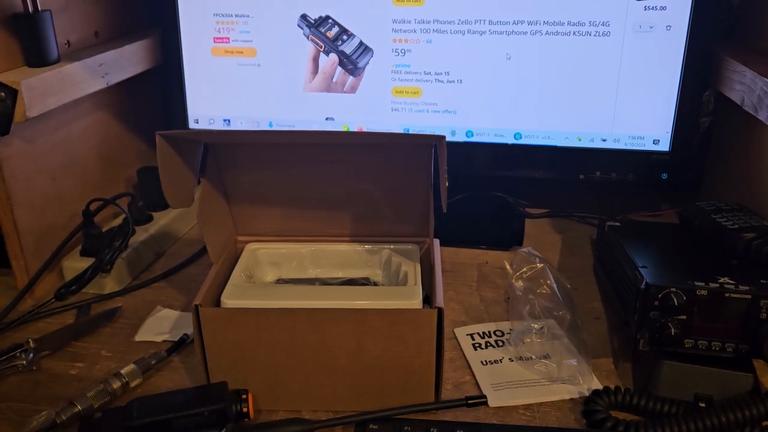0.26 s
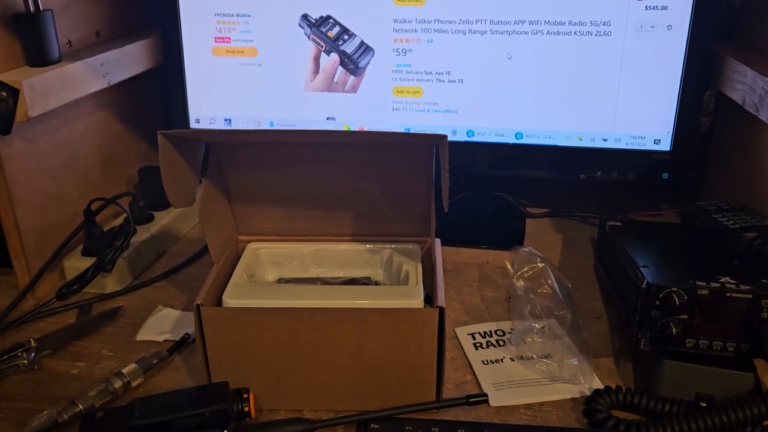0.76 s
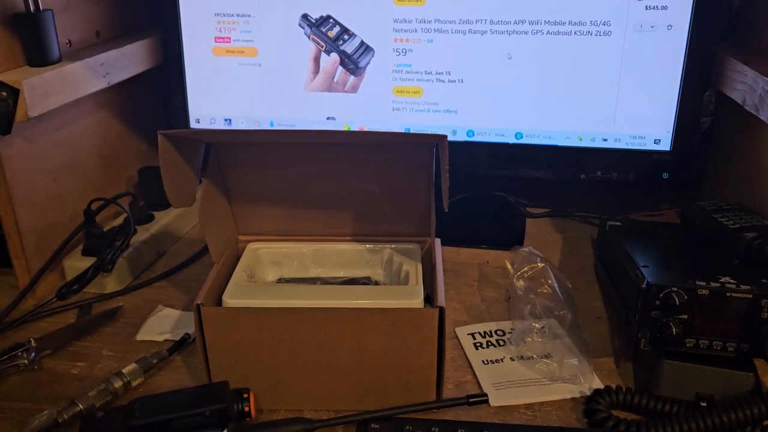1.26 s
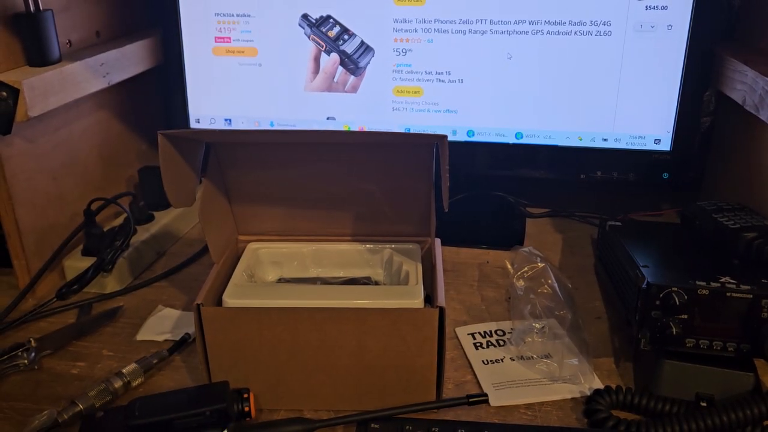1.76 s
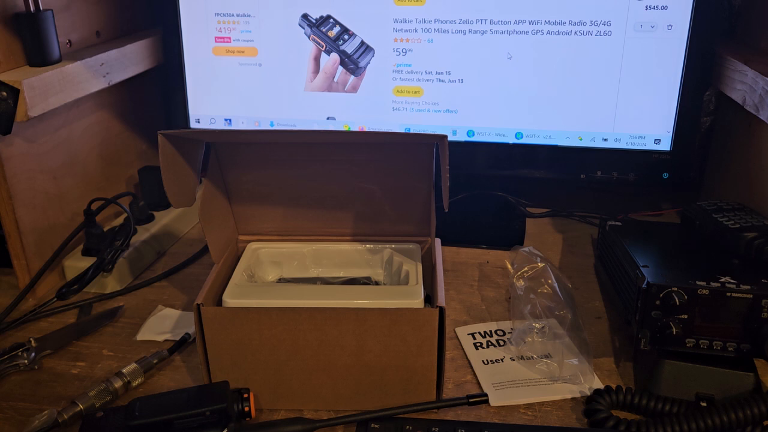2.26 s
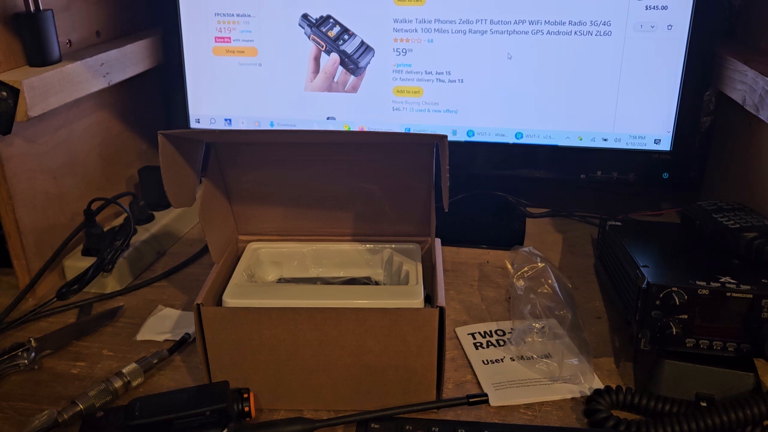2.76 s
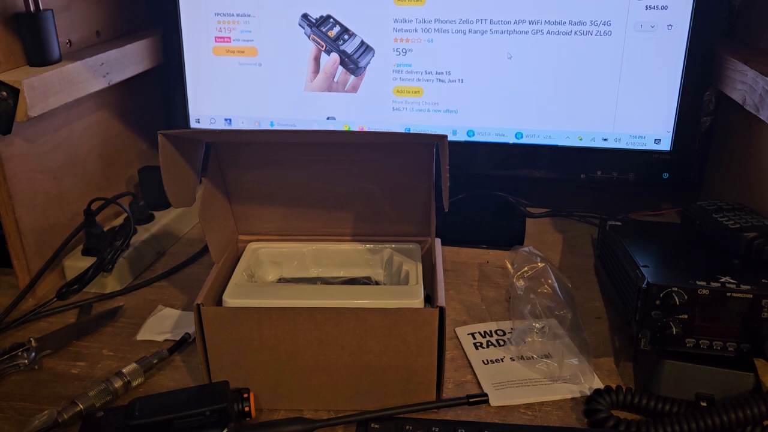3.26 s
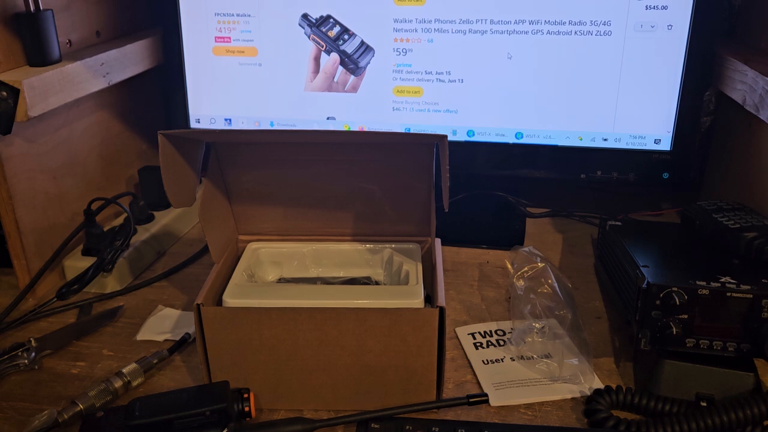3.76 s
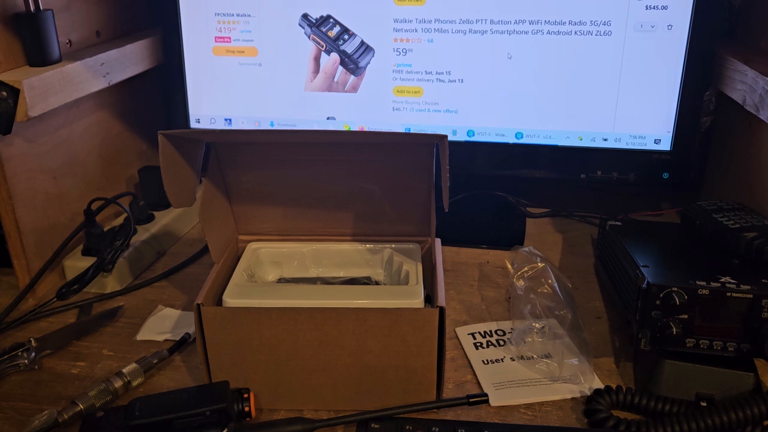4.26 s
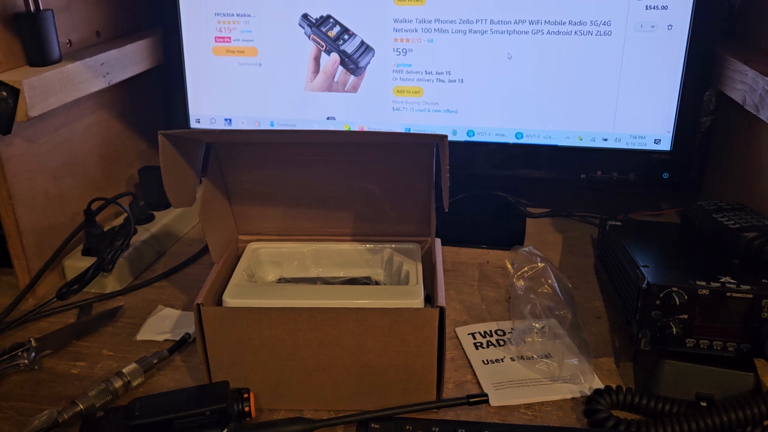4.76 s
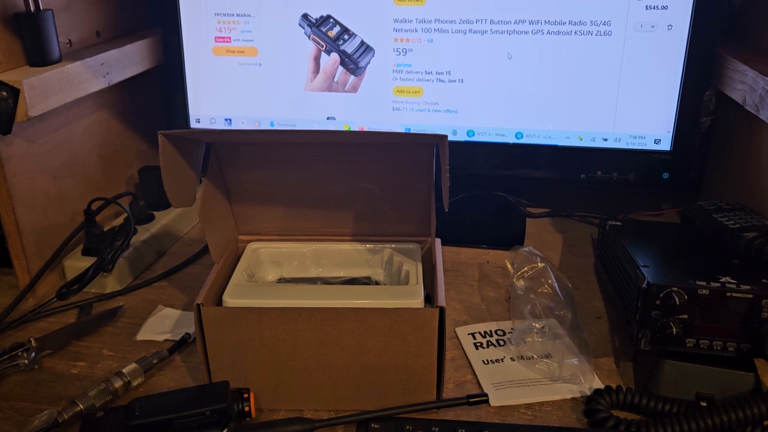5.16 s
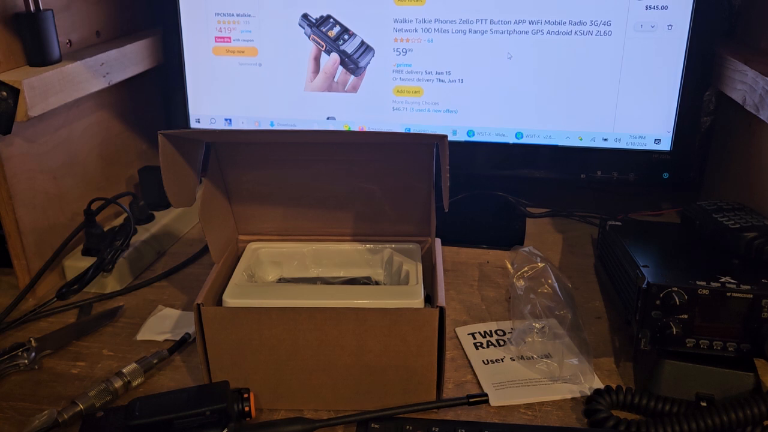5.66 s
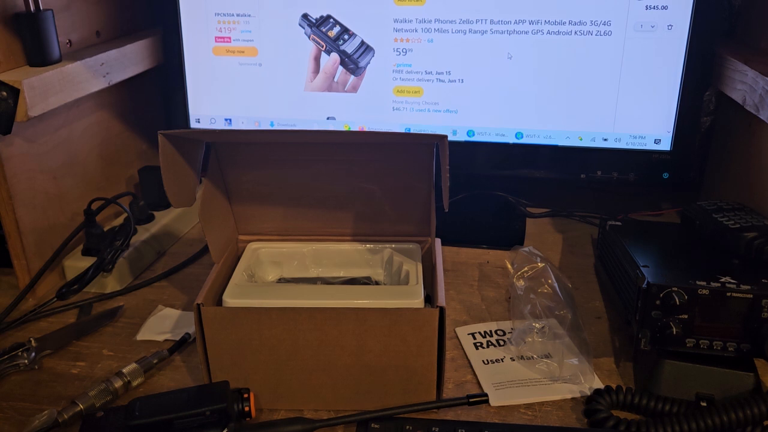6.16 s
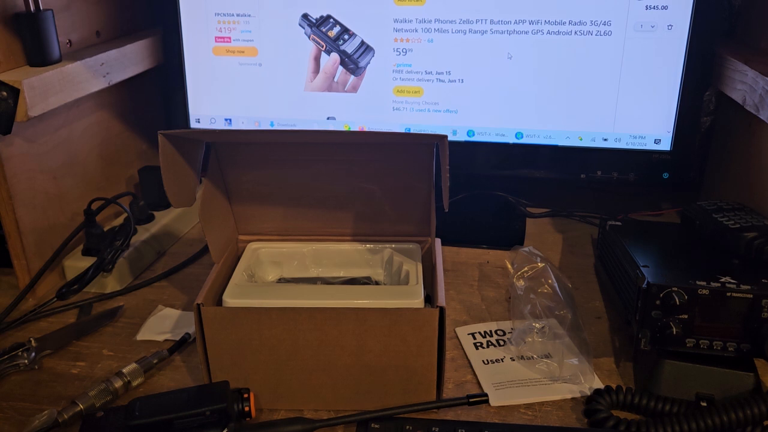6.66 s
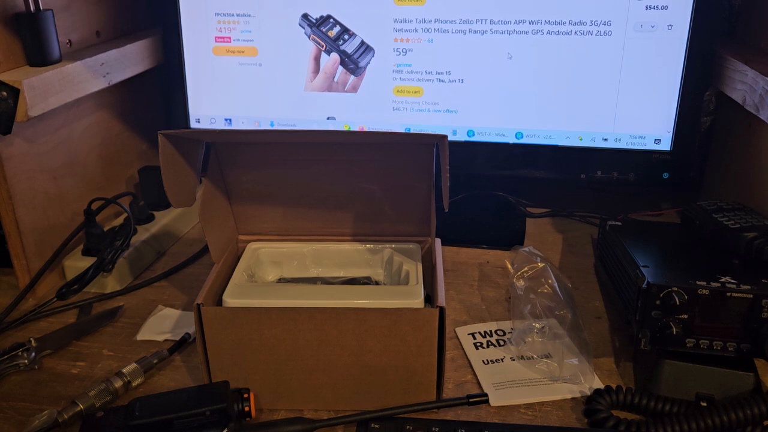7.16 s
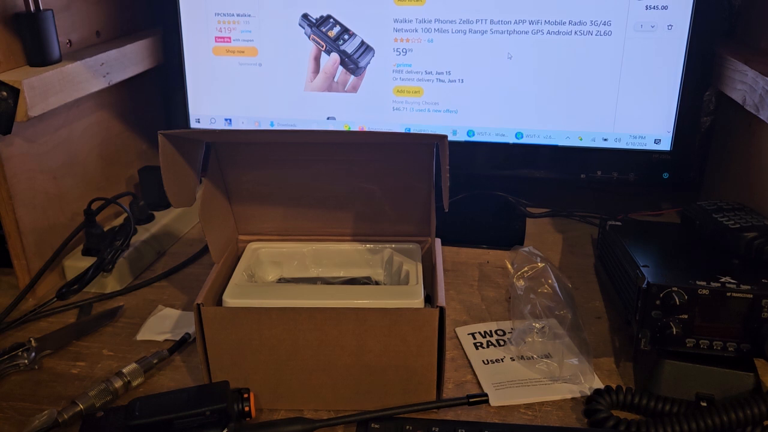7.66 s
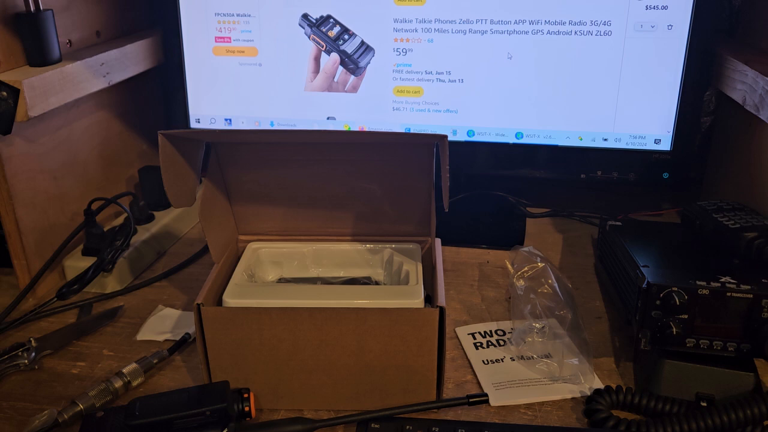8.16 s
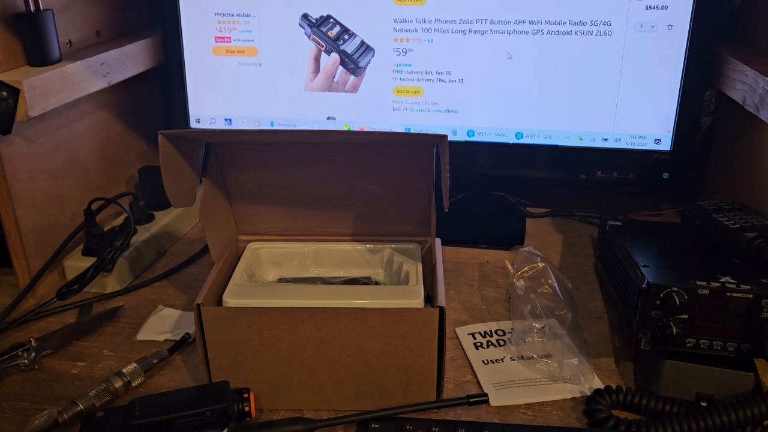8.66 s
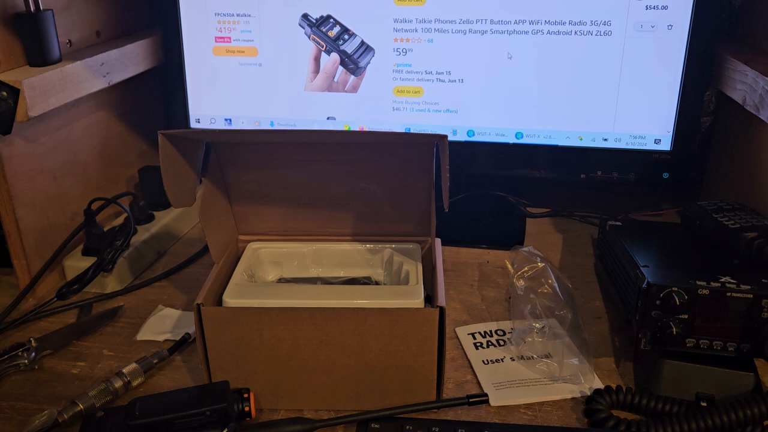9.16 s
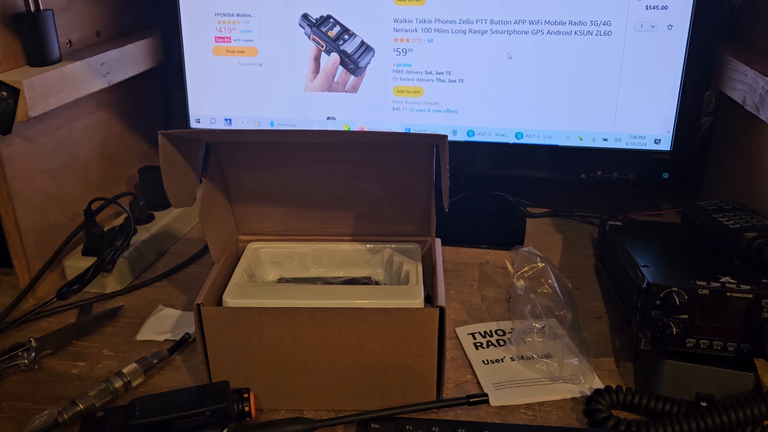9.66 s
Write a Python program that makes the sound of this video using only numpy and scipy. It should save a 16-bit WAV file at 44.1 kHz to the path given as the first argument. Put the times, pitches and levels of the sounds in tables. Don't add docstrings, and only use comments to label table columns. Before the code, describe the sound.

A low, continuous hum of a motor and fan beneath a soft, dull hiss of moving air, in a small indoor room. Early on, a tiny sharp plastic crack and a few softer clicks stand out; later ticks are extremely faint. The level stays low and constant, with only slight fluctuation, heard in stereo from a microphone resting on the desk.

```python
import sys
import numpy as np
from scipy import signal
from scipy.fft import rfft, irfft
from scipy.io import wavfile
from scipy.ndimage import map_coordinates

SR = 44100
rng = np.random.default_rng(int(sys.argv[2]) if len(sys.argv) > 2 else 0)


def boost(x):
    u = np.asarray(x, float) / 20
    return 10 ** u


def store_pcm(level_fs):
    pcm = np.round(np.clip(level_fs, -1, 1) * 32767).astype(np.int16)
    wavfile.write(sys.argv[1], SR, np.atleast_2d(pcm).T)


N = 437472
TIME = np.arange(N) / SR
HZ = np.fft.rfftfreq(N, 1 / SR)

# pitch_hz, left_db_per_hz, right_db_per_hz
AIR_SPECTRUM = [(15, -74, -79), (54, -68, -67.5), (91, -77.5, -80.5), (184, -69.5, -70.5),
                (406, -71, -71.5), (530, -84, -85.5), (888, -75.5, -77), (1936, -91.5, -94.5)]
# pitch_hz, width_hz,
# left_db, right_db
ROOM_MODES = [(108.6, 11, 6, 6), (166.7, 10, 4, 7), (185, 8.3, 11, 7), (196.2, 39.4, -8.5, -11),
              (269.4, 51.5, -6, -8), (294.3, 8.1, -12, -10), (332.3, 12.8, -6.5, -3.5), (352, 19, -4, -4),
              (385, 20, -6.5, -9.5), (422, 31, -7, -4), (540, 16, 4.5, 2.5), (587, 13, -4, -3),
              (657, 16, -10, 5), (676, 17, -5, 6),
              (40, 12, -4, -4), (78, 20, -1.5, -1.5)]
# pitch_hz, width_hz, left_db, right_db
HOUSING_MODES = [(750, 96, 1, -5), (800, 54, -8, 0), (884, 44, -7.5, -6), (981, 174, -8.5, -12),
                 (1165, 64, -7.5, -6.5), (1334, 54, -1, -2), (1720, 60, 3.5, -2), (2147, 354, 4, 7),
                 (2200, 70, 3.5, 2), (3010, 840, 3, 0.5), (3130, 90, 1.5, 1.5), (3600, 73, 5.5, 2.5),
                 (3900, 50, 5, -2.5), (7300, 440, 2.5, 3)]
# pitch_hz, width_hz, left_db, right_db
BODY_SHADOWS = [(6260, 1700, -0.5, -1.5), (9580, 1500, -7, -4), (13653, 650, 0, -6)]
# pitch_hz, left_db, right_db
PORT_RESPONSE = [(1965, 0, 0), (4350, -4.5, -2), (7340, -8.5, -7), (8710, -11, -8), (9700, -19, -22.5),
                 (12000, -21, -11.4), (15600, -28, -25.5)]
# pitch_hz, correlation (-1 to 1)
PORT_CORRELATION = [(60, 0.82), (290, 1), (640, 0.69), (1410, 0.44), (3100, 0.42), (6820, 0.35),
                    (9000, 0.09), (15000, .03)]
# pitch_hz, share (0 to 1)
NEAR_SHARE = [(500, 0), (1200, .45), (4000, .4), (9000, .25), (15000, .15)]
# multiple, level_db (rms), left_minus_right_db, left_lead_rad
MAINS_PARTIALS = [(4, -60.7, 1.2, 0.5), (6, -72.8, 2.1, 0.3)]
# start_s, peak_db, treble_tilt_db_per_octave, burst_s
TICKS = [
    (.3250, -42, 2.5, .003),
    (.3290, -45, 1, .007),
    (.3600, -55, -2, .012),
    (.4195, -52, -1, .008),
    (1.3165, -71, 13, .006),
    (4.6650, -73, 11, .03),
    (4.6950, -72, 11, .025),
]
# pitch_hz, level_db
TICK_COLOUR = [(530, -30), (900, -6), (1760, -1), (4470, -5.5), (7740, -8), (9830, -24), (12200, -15),
               (15700, -27)]
# pitch_hz, level_db, t60_s
SHELL_MODES = [(1750, -8, .08), (3176, -5, .06), (3820, -6, .2), (4560, -3.5, .05), (5300, -7, .04),
               (6730, -15, .06), (8200, -16, .06)]
# multiple, level_db (rms), left_minus_right_db, left_lead_rad
FAN_PARTIALS = [(1, -43.5, 1.2, -0.2), (2, -54.1, 0.7, -0.2), (3, -74.7, -4.3, -0.0), (4, -47.7, 0.5, -0.0),
                (6, -66.1, 2.0, 0.0), (8, -63.8, 2.2, 0.8), (15, -56.4, -0.4, 0.4), (16, -75.1, 4.0, 0.5),
                (22, -76.3, 4.3, 0.2), (30, -63.1, -3.3, 0.4)]
# multiple, level_db (rms), left_minus_right_db, left_lead_rad
MOTOR_PARTIALS = [(1, -35.7, .8, -.1), (2, -70.7, 1.4, -.1), (4, -73.2, -4.7, -.1), (15, -78.4, 2.7, .7),
                  (17, -71.4, 10.8, 1.4), (20, -76.5, 3.1, -2.), (22, -72.6, 4.3, 1.), (24, -78.3, 3.8, .6),
                  (25, -72., 3.6, 1.2), (28, -79., -1., -1.4), (29, -78., 3.9, 1.1), (31, -80., -.3, -.3),
                  (110, -85.5, -3.8, .9), (111, -86.6, -6.9, 2.1)]
# pitch_hz, level_db (per multiple)
VALVE_RATTLE = [(900, -100), (1100, -84), (2500, -92), (6500, -96), (8000, -99), (9600, -116), (11000, -97),
                (14000, -112)]
# pitch_hz, level_db
SIDE_KEPT = [(9100, 0), (9400, -8), (9650, -10), (9800, 0), (15000, 0), (15200, -7), (16000, -7)]

MOTOR_HZ, FAN_HZ, MAINS_HZ = 57.859, 27.06, 60.005
MOTOR_START_TURNS, FAN_START_TURNS = .23, .54
PORT_LAG_S, NEAR_T60_S = 7e-5, .11
TICK_TAIL_DB, TICK_TAIL_T60_S, TICK_RING_DB = -10, .15, 2
TOP_HZ = 15720


def on_log(table, column):
    table = np.array(table)
    return np.interp(np.log(HZ + 1), np.log(table[:, 0]), table[:, column])


def walk(rate_hz):
    knots = rng.standard_normal(int(N / SR * rate_hz) + 6)
    coarse = TIME[::64]
    wander = map_coordinates(knots, [coarse * rate_hz + 2], order=3)
    return 1.07 * np.interp(TIME, coarse, wander)


def diffuse_noise():
    like = np.clip(on_log(PORT_CORRELATION, 1), -.99, .999)
    mid, side = rfft(rng.standard_normal((2, N)))
    common = np.sqrt((1 + like) / 2) * mid
    opposed = np.sqrt((1 - like) / 2) * side
    both = np.array([common + opposed, common - opposed])
    both[0] *= np.exp(2j * np.pi * HZ * PORT_LAG_S)
    return both


def near_reflections():
    echoes = rng.standard_normal((2, N)) * boost(-60 * TIME / NEAR_T60_S)
    echoes /= np.sqrt(np.sum(echoes ** 2, axis=1, keepdims=True))
    return rfft(rng.standard_normal(N)) * rfft(echoes)


def air():
    db = np.array([on_log(AIR_SPECTRUM, port) + on_log(PORT_RESPONSE, port) for port in (1, 2)])
    for hz, width_hz, left_db, right_db in ROOM_MODES + HOUSING_MODES + BODY_SHADOWS:
        close = abs(HZ - hz) < 3 * width_hz
        bell = np.exp(-4 * np.log(2) * ((HZ[close] - hz) / width_hz) ** 2)
        db[:, close] += np.outer([left_db, right_db], bell)
    share = on_log(NEAR_SHARE, 1)
    noise = np.sqrt(1 - share) * diffuse_noise() + np.sqrt(share) * near_reflections()
    flow = noise * boost(db) * np.sqrt(SR / 2)
    out = np.zeros((2, N))
    swell = walk(2.955)
    octave = np.clip(np.log2(HZ / 125 + 1e-9), 0, 7)
    for band in range(8):
        part = irfft(flow * np.clip(1 - abs(octave - band), 0, 1), N)
        out += part * boost(band / 7 * (.33 * swell + .4 * walk(9.)))
    return out


def partials(table, turns, flutter, flutter_hz):
    out = np.zeros((2, N))
    stir = [walk(flutter_hz) + 1j * walk(flutter_hz) for _ in range(2)]
    for row, (multiple, level_db, pan_db, lead_rad) in enumerate(table):
        share = min(flutter * multiple, .4)
        waver = np.sqrt(1 - share ** 2) + share / np.sqrt(2) * stir[row % 2]
        offset = rng.random() * (multiple > 1)
        tone = waver * np.exp(2j * np.pi * (multiple * turns + offset))
        for port, side in enumerate((.5, -.5)):
            gain = np.sqrt(2) * boost(level_db + side * pan_db)
            out[port] += (tone * (gain * np.exp(1j * side * lead_rad))).real
    return out


def transformer():
    return partials(MAINS_PARTIALS, MAINS_HZ * TIME, flutter=.03, flutter_hz=3.)


def ticks(size=N // 24):
    out = np.zeros((2, N))
    coarse = slice(0, None, (len(HZ) - 1) // (size // 2))
    bins = size // 2 + 1
    colour_db = on_log(TICK_COLOUR, 1)[coarse][:bins]
    octaves = np.log2(HZ[coarse][:bins] / 4000 + 1e-3)
    noise = irfft(diffuse_noise(), N) / np.sqrt(np.mean(boost(colour_db) ** 2))
    age = TIME[:size]
    tail = boost(TICK_TAIL_DB - 60 * age / TICK_TAIL_T60_S)
    for start_s, peak_db, tilt_db, burst_s in TICKS:
        first = int(start_s * SR)
        span = slice(first, first + size)
        shape = np.exp(-age / burst_s) + tail
        crack = irfft(rfft(noise[:, span]) * boost(colour_db + tilt_db * octaves), size)
        out[:, span] += boost(peak_db) * shape * crack
        for hz, mode_db, t60_s in SHELL_MODES:
            swing = np.sin(2 * np.pi * (hz * age + rng.random((2, 1))))
            out[:, span] += boost(peak_db + TICK_RING_DB + mode_db - 60 * age / t60_s) * swing
    return out


def fan():
    turns = FAN_START_TURNS + np.cumsum(FAN_HZ + .02 * walk(.6)) / SR
    return partials(FAN_PARTIALS, turns, flutter=.022, flutter_hz=14.)


def valve_rattle(turns, size=8192):
    rows = np.array(VALVE_RATTLE)
    multiple_hz = MOTOR_HZ * np.arange(1, size // 2 + 2)
    db = np.interp(np.log(multiple_hz), np.log(rows[:, 0]), rows[:, 1], left=-200, right=-200)
    spectrum = boost(db) * rfft(rng.standard_normal((2, size))) * np.sqrt(size / 2)
    cycle = irfft(spectrum, size)
    place = np.arange(size) / size
    return np.array([np.interp(turns % 1, place, port, period=1) for port in cycle])


def motor():
    turns = MOTOR_START_TURNS + np.cumsum(MOTOR_HZ + .004 * walk(.5)) / SR
    return partials(MOTOR_PARTIALS, turns, flutter=.012, flutter_hz=3.) + valve_rattle(turns)


def scene():
    return air() + transformer() + ticks() + fan() + motor()


def band_limit(x):
    return signal.sosfilt(signal.butter(12, 15820, fs=SR, output="sos"), x)


def record(dry):
    mid, side = (dry[0] + dry[1]) / 2, (dry[0] - dry[1]) / 2
    below_top = HZ < TOP_HZ
    mid = irfft(rfft(mid) * below_top, N)
    side = irfft(rfft(side) * boost(on_log(SIDE_KEPT, 1)) * below_top, N)
    return band_limit(np.array([mid + side, mid - side]))


dry = scene()
out = record(dry)
store_pcm(out)
```